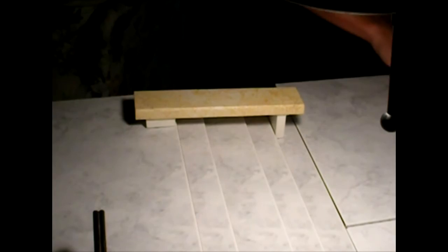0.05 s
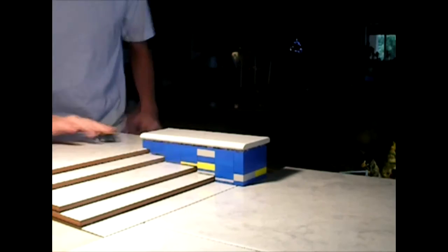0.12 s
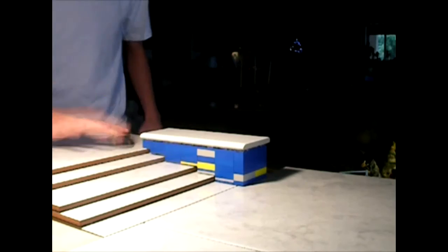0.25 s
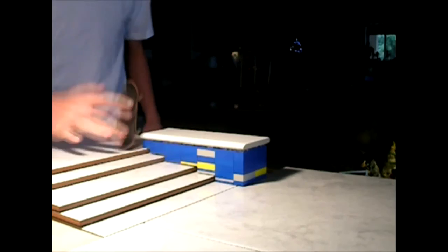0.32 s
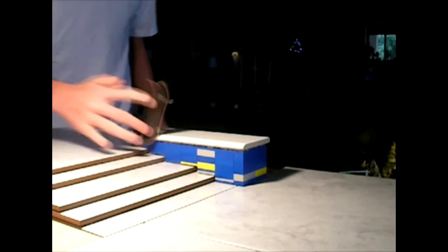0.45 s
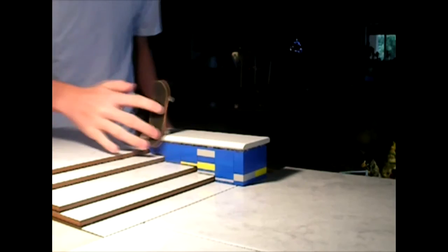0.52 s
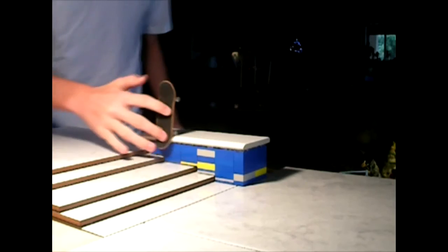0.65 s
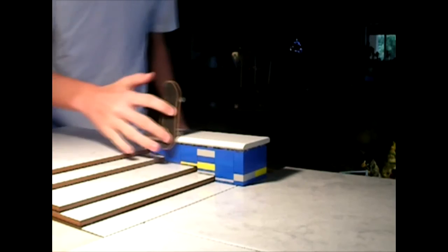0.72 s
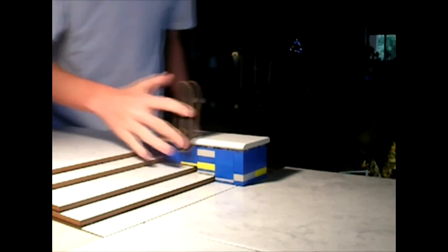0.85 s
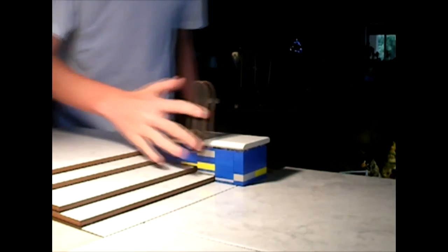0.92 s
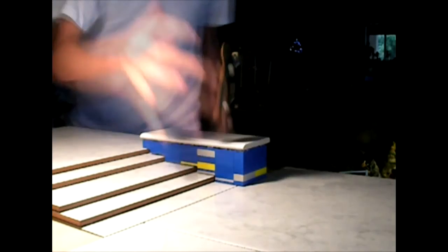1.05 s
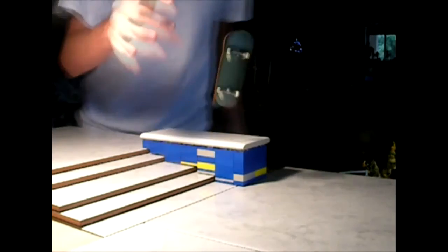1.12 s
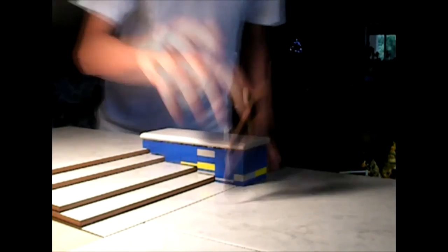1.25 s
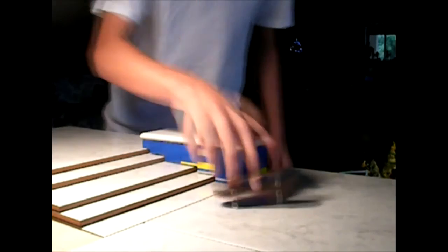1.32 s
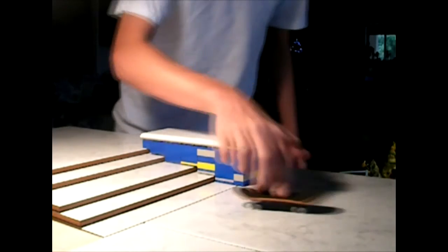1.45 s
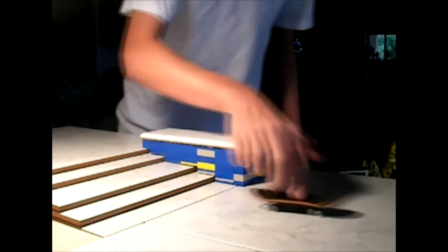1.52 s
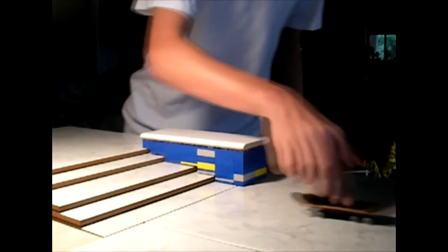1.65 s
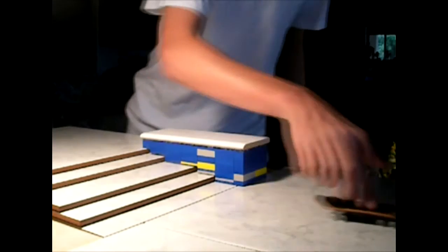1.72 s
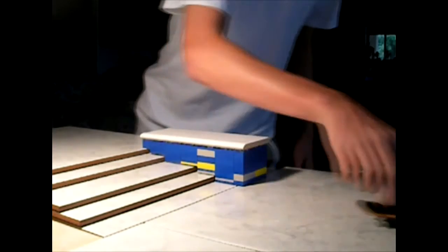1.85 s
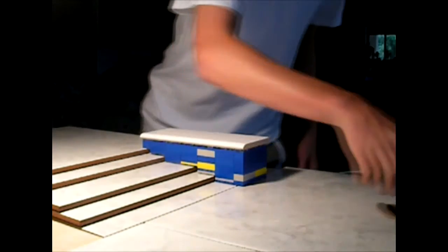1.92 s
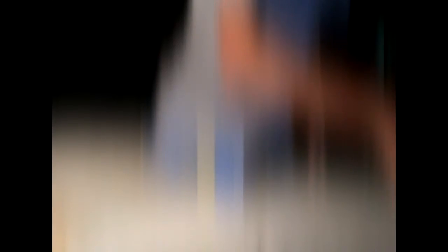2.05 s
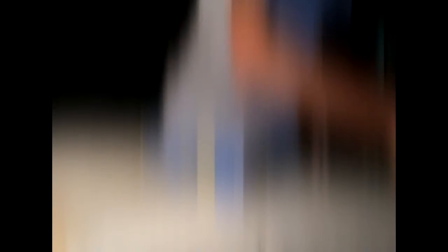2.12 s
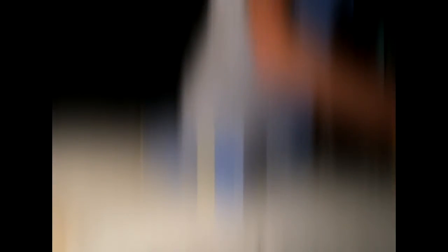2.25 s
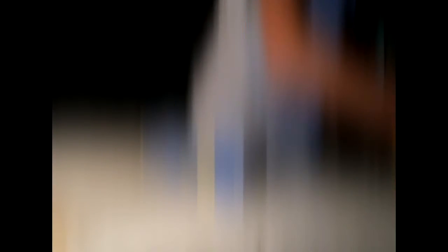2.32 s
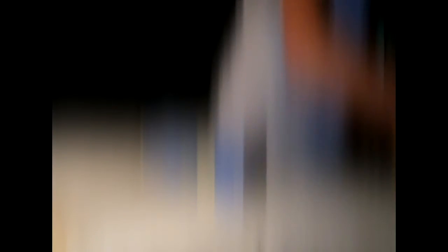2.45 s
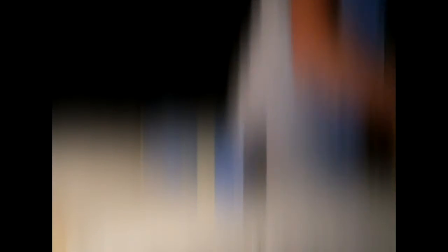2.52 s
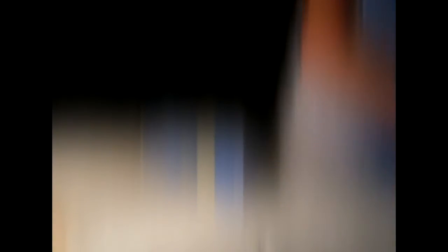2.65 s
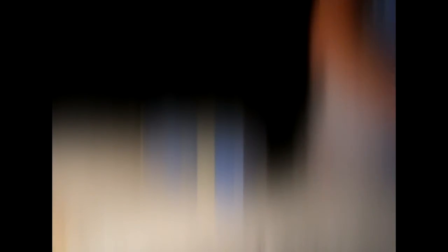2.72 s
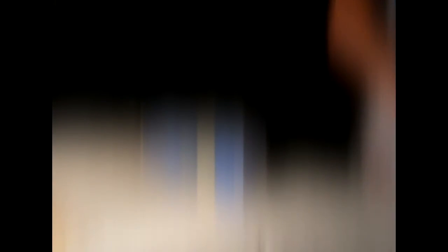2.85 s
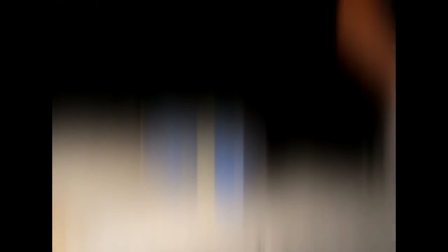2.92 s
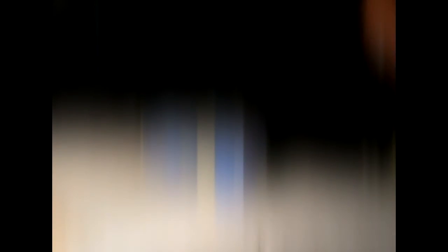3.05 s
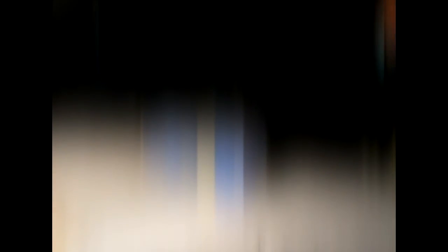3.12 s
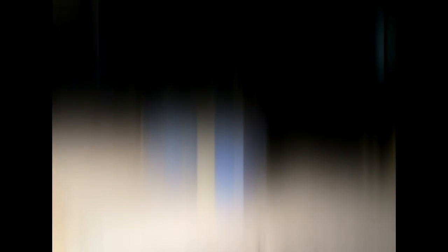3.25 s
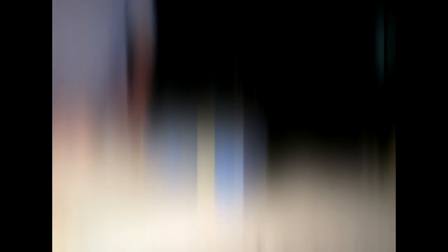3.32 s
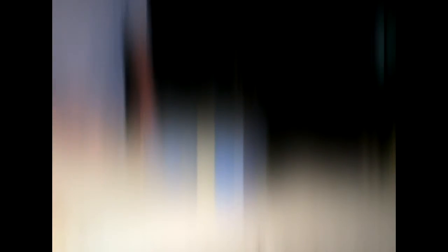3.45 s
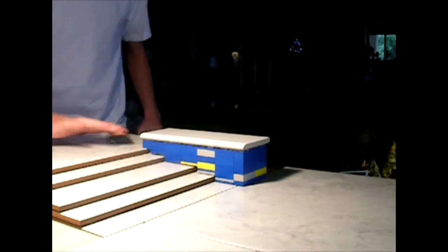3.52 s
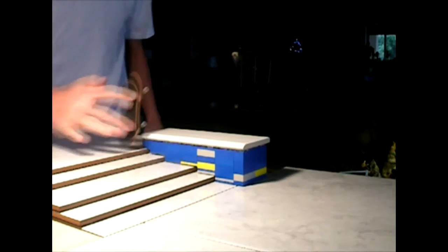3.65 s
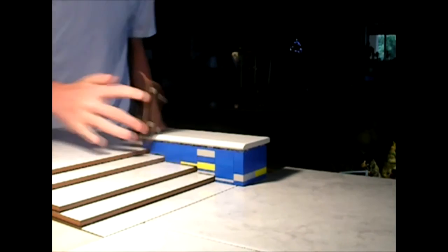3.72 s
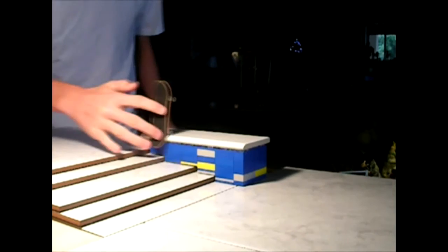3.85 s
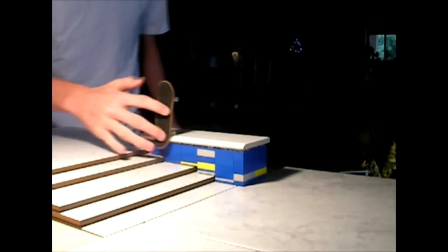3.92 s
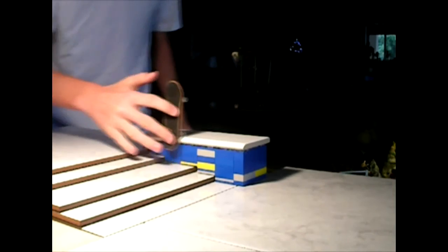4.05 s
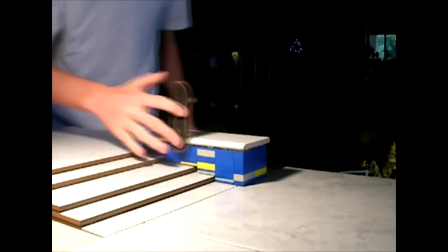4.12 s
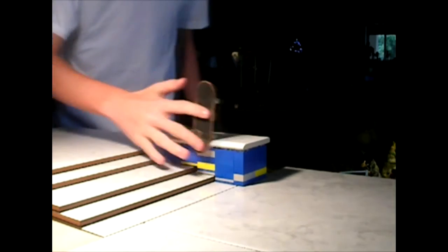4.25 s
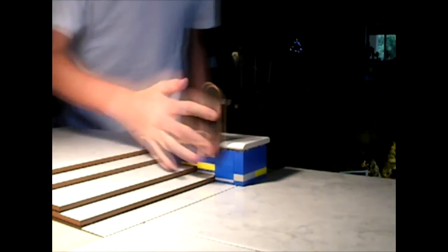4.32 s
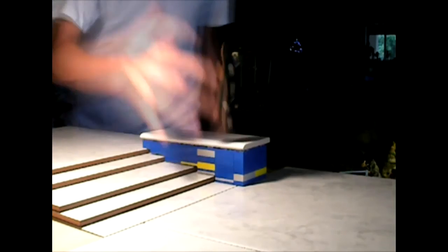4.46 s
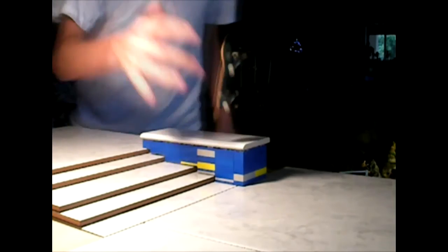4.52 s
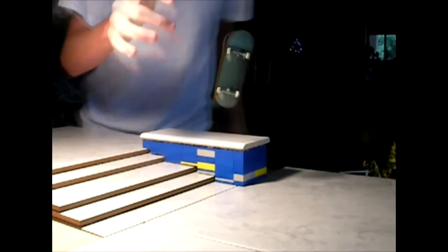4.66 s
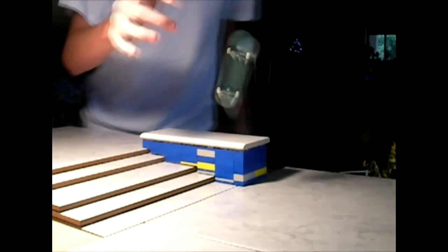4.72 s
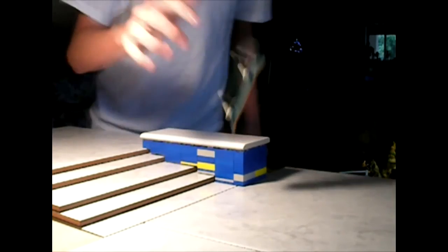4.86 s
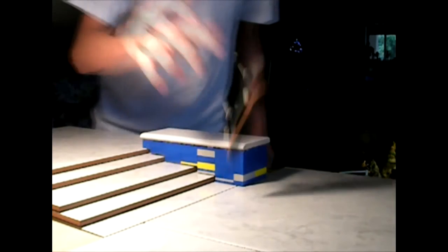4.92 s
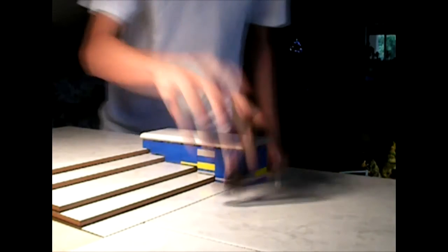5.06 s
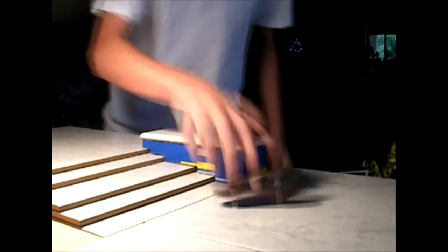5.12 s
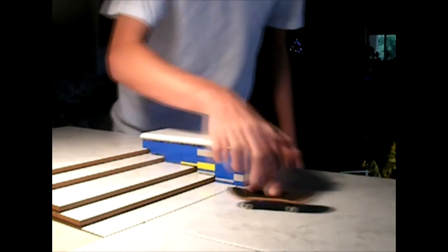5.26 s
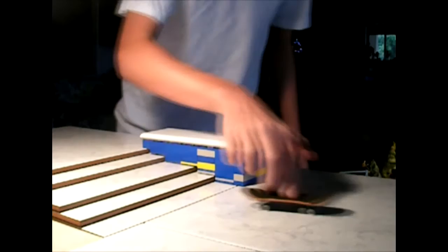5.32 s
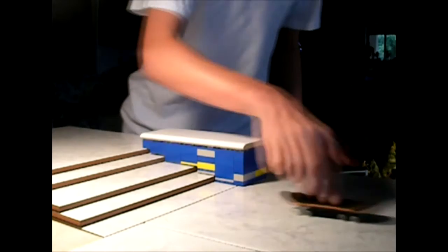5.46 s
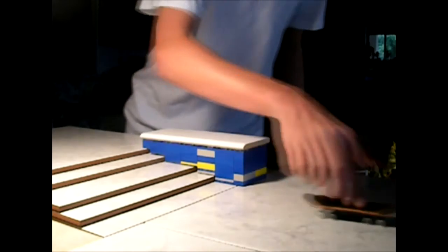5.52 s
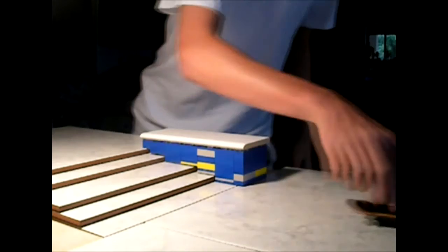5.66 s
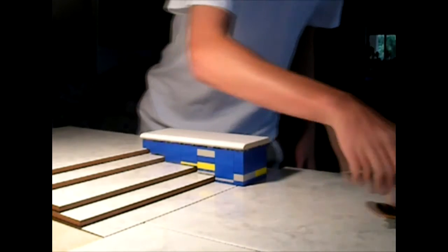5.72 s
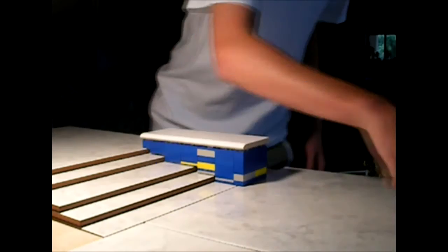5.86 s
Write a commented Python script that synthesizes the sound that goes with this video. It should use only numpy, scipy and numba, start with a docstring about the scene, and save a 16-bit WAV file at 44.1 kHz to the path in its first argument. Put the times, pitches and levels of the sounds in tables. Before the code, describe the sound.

A toy fingerboard rolls softly on a tabletop, heard close through a dull mono microphone with steady faint hiss. At about 0.4 seconds it pops with a sharp click, then clatters onto a small hollow ledge from 0.6 to 0.7 seconds. Faint scuffs follow near 1.2. Around 1.5 seconds it lands on the table in a quick burst of clacks and rolls on, its little wheels whirring with a light rumble. It knocks against a wooden obstacle at 2.2 seconds and harder at 2.45, rattles briefly, and gives lighter taps near 2.9 and 3.1. The first trick then repeats: a soft run-up from 3.4 seconds, a pop at 3.75 and ledge clatter around 3.9 to 4. The hiss drops slightly, and two faint scuffs come near 4.6. Another clacking landing at 5.3 seconds leads into a roll that fades by about 5.9.

```python
"""Fingerboard tricks on a tabletop

A fingerboard rolls up, pops onto a hollow ledge, drops to a table and clatters over a wooden obstacle.
Each impact sets the surface and the little deck in free, damped vibration; between impacts, surface
roughness forces a rumble and makes the wheels sing. A few soft scuffs are heard. The run-up and the
landing sound a second time, all over the hiss of a dull mono microphone."""
import sys
import numpy as np
from scipy import signal
from scipy.fft import rfft, irfft
from scipy.io import wavfile
from scipy.ndimage import uniform_filter1d
from numba import njit

SR = 44100
rng = np.random.default_rng(int(sys.argv[2]) if len(sys.argv) > 2 else 0)


def dump_mix(stems):
    """Bounce the given channels to the path in sys.argv[1] as a 16-bit WAV at rate SR."""
    frames = np.atleast_2d(stems).T  # one column per channel
    limited = np.clip(frames, -1, 1)  # hard clip at full scale
    pcm = np.round(limited * 32767).astype(np.int16)
    wavfile.write(sys.argv[1], SR, pcm)


N = 260410
TIME = np.arange(N) / SR
AGE = TIME[:SR // 3]  # time since an impact

# normal modes: f/Hz, relative energy/dB, t60/s
PLATFORM_MODES = [(154.3, -6.5, 0.1), (197, -13, 0.1), (312, 0.5, 0.091), (362, -4, 0.037), (470, 1, 0.049),
                  (563, 4.5, 0.11), (696, 1, 0.041), (884, -8, 0.05), (1400, -11.5, 0.016),
                  (1566, -13, 0.066), (2440, -8, 0.022), (3460, -1, 0.017), (4260, -9.5, 0.013)]
LEDGE_MODES = [(152, -8, 0.096), (251, -9, 0.086), (299, 0, 0.096), (349, -4, 0.11), (393, 1, 0.043),
               (494, -11, 0.033), (558, -6, 0.042), (709, -6.5, 0.065), (790, -5, 0.018), (956, -2, 0.034),
               (1520, -2, 0.0093), (1912, -6, 0.02), (3070, -13.5, 0.077)]
TABLE_MODES = [(131, -19.5, 0.29), (158, -19, 0.15), (186, -20, 0.15), (317, -8, 0.12), (393, -9.5, 0.068),
               (452, -5.5, 0.051), (532.4, 1, 0.095), (687, -5, .04), (888, 5, 0.025), (1037, -1, 0.066),
               (1180, -5, 0.023), (1552, -7.5, 0.11), (1940, -4, .05), (2350, -8.5, .07), (2460, -9, 0.12)]
OBSTACLE_MODES = [(150, -17, 0.31), (220, -8, 0.081), (347, -0.5, 0.045), (444, -2.5, 0.084),
                  (515, -6, 0.069), (685, 0.5, 0.048), (740, -3.5, 0.031), (840, 8.5, 0.026),
                  (950, 2, 0.045), (1010, 0, 0.035), (1240, -8.5, 0.043), (1413, -6.5, .05),
                  (1460, -9, 0.096), (1844, -19, 0.13), (2080, -15.5, 0.092), (2930, -20.5, .06)]
DECK_MODES = [(1577, -2, 0.24), (1959, 5, 0.028), (2220, 3, 0.028), (2377, 1.5, 0.072), (2592, -7, .05),
              (2890, -1, 0.066), (2970, -7, 0.05), (3530, -0.5, 0.022), (3620, -9.5, .025),
              (4440, -5.5, 0.031)]
HELD_DECK_MODES = [(499, -4.5, 0.077), (974, 0, .025), (1413, -1, 0.034), (1840, -2, 0.0056),
                   (2650, -12.5, 0.012), (3240, -11, 0.016)]  # damped by fingers
TRUCK_MODES = [(735, -6.5, 0.019), (960, -1.5, 0.0084), (1107, -0.5, 0.039), (1330, -9, 0.005),
               (1630, -5, 0.025), (1690, -11.5, 0.029)]  # trucks and wheels under load
# stretches of rolling: start t/s, end t/s, wheel ring level/dB, rumble level/dB, grit level/dB,
# wheel tone f/Hz, tone-to-truck ratio/dB, run-out t60/s
ROLLS = [ (0.0, .1, -32.5, -48, -44, 898, -2, .03), (.145, .165, -35.5, -48, -40.5, 1270, -5, 0.36),
         (.215, .295, -40, -47, -46.5, 1410, -0.5, 0.18), (.4, .43, -34.5, -42.5, -37, 1070, -21, 0.093),
         (1.53, 1.7, -36, -45, -53.5, 891, -0.5, 0.25), (1.725, 1.915, -32.5, -42, -45, 885, 5, 0.62),
         (2.04, 2.2, -35, -38, -51.5, 855, 6.5, 0.14), (2.25, 2.315, -31.5, -35, -29.5, 890, 5, 0.13),
         (2.35, 2.59, -32, -36.5, -41.5, 870, 1, 0.61), (2.88, 3.03, -49, -47.5, -63, 870, 6.5, 0.23),
         (3.047, 3.055, -34.5, -44, -63, 853, 13, 0.088)]
# impacts, with relative levels: t/s, thud level/dB, knock level/dB, crack level/dB, contact f/Hz
POP_HITS = [(.4418, -23.5, -25, -15.5, 2605), (.4522, -23, -25, -29, 2690)]
LEDGE_HITS = [(.5905, -24, -16.5, -25, 1600), (.6066, -13.5, -18, -23, 1890), (.618, -21, -32, -25.5, 2350),
              (.6305, -25.5, -18.5, -23, 2110), (.6425, -28, -27.5, -27.5, 3270),
              (.6795, -21.5, -21.5, -28, 2150), (.7105, -30, -35.5, -39.5, 1950)]
TABLE_HITS = [(1.4391, -23, -15, -12, 3710), (1.4403, -21.5, -21, -15, 1915),
              (1.4528, -30, -29, -25.5, 2680), (1.4795, -10, -21.5, -20, 3680),
              (1.4865, -23.5, -23, -21.5, 2430), (1.496, -20, -23, -18, 2300),
              (1.508, -15, -23.5, -18, 2400), (1.5215, -25.5, -29, -25.5, 2490)]
OBSTACLE_HITS = [(2.2166, -14, -17, -12, 1620), (2.2257, -24, -20, -17, 1600),
                 (2.239, -23, -24, -25.5, 2900), (2.4392, -29, -15, -16, 1400), (2.451, -5, -8, -14, 2760),
                 (2.4628, -27.5, -33, -27.5, 2200), (2.8535, -19.5, -21.5, -34, 3570),
                 (3.0605, -27, -37, -53, 1410), (3.0955, -24, -34, -30, 2720)]
# wheels and board running down after an impact: t/s, whirr level/dB, shake level/dB, t60/s
SPINS = [(0.457, -36, -38, 0.41), (0.647, -44, -36, 0.44), (1.445, -43.5, -45.5, 0.38),
         (1.526, -30, -34, 0.86), (2.53, -31.5, -27, 0.37)]
# soft scuffs, and the faint lead-in as the run-up sounds again: t/s, level/dB, Gaussian half-width/s
SOFT_SWELLS = [(1.112, -49, 0.009), (1.17, -37.5, 0.0083), (3.398, -43, 0.033), (4.617, -41, 0.0078),
               (4.675, -40.5, 0.0075)]
# noise spectra and frequency responses: f/Hz, relative level/dB
RUMBLE_SPECTRUM = [(60, -26), (110, -14), (155, -5), (240, -10.5), (320, 2.5), (390, 5), (455, 0),
                   (530, 1.5), (640, -6), (900, -11), (1600, -31)]
GRIT_SPECTRUM = [(900, -23), (1600, -3), (2100, 5.5), (2800, 2), (3600, -1), (4400, -5), (5400, -5.5),
                 (9000, -5)]
CRACK_SPECTRUM = [(400, -20.5), (1000, -5), (2000, 4.5), (3400, -0.5), (4400, -2), (5500, -4), (9000, -7.5)]
HISS_SPECTRUM = [(20, 9.5), (60, -8), (110, -12), (190, 3.5), (245, -1), (320, 5), (450, 1.5), (900, -1.5),
                 (1900, -7.5), (3000, -12), (4200, -20), (9000, -17.5)]
IMPACT_LOW_CUT = [(30, -24.5), (80, -12), (135, -5), (300, 0)]  # low cut applied to the impacts
MICROPHONE_RESPONSE = [(20, -3.5), (70, -3), (140, -0.5), (3900, -0.5), (4500, -5.5), (5100, -13.5),
                       (6200, -27.5), (7000, -35.5), (8000, -35.5), (9500, -49), (12500, -45)]
# brief dips in the hiss: t/s
HISS_DIPS = [4.248, 4.348, 4.647, 4.846, 5.012, 5.147, 5.246]
# passages that sound again: start t/s, end t/s, delay/s, gain/dB
REPEATS = [(.11, 1.0, 3.3034, 0), (1.42, 2.1, 3.8372, -3.2)]

PUSH_RISE_S = 0.019  # time constant of the swell as the fingers push
COAST_DB_PER_S, COAST_OCTAVES_PER_S = 4.5, 0.37  # level and pitch sag as the board slows


def undb(db):
    """Amplitude ratio of a level in decibels."""
    return 10 ** (np.asarray(db) / 20)


def unit(x):
    """Normalisation to rms 1."""
    return x / np.sqrt(np.mean(x ** 2))


def unit_pulse(x):
    """Normalisation to the energy of 5 ms at rms 1."""
    return x / np.sqrt(np.sum(x ** 2) / (SR / 200))


def decay(t, t60):
    """Exponential damping, 60 dB in t60."""
    return np.exp(-np.log(1000) * t / max(t60, 1e-3))


def add(track, start_s, sound):
    """Superposition of a sound on the track."""
    i = max(int(start_s * SR), 0)
    track[i:i + len(sound)] += sound[:max(N - i, 0)]


def colour(x, points, size=4096):
    """Minimum-phase filtering along (f/Hz, level/dB) points."""
    hz, db = np.transpose(points)
    f = np.maximum(np.fft.rfftfreq(size, 1 / SR), 1)
    gain = undb(np.interp(np.log(f), np.log(hz), db))
    cepstrum = irfft(np.log(gain))
    cepstrum[1:size // 2] *= 2
    cepstrum[size // 2 + 1:] = 0
    return signal.fftconvolve(x, irfft(np.exp(rfft(cepstrum))))[:len(x)]


@njit
def resonate(x, hz, width_hz):
    """Second-order resonance with a moving centre frequency."""
    y, band_state, low_state = np.empty(len(x)), 0., 0.
    for i in range(len(x)):
        g, damping = np.tan(np.pi * hz[i] / SR), width_hz / hz[i]
        band = (band_state + g * (x[i] - low_state)) / (1 + g * (g + damping))
        band_state = 2 * band - band_state
        low_state += 2 * g * band
        y[i] = damping * band
    return y


def wander(per_s):
    """Smooth random modulation, rms 1."""
    hold = int(SR / per_s)
    steps = np.repeat(rng.standard_normal(N // hold + 1), hold)
    return unit(uniform_filter1d(steps, hold)[:N])


def roughness(spread_db=0.5, per_s=12000):
    """Shot noise: dense, tiny impacts on a rough surface."""
    impulses = (rng.random(N) < per_s / SR) * rng.standard_normal(N)
    return impulses * undb(spread_db * np.minimum(rng.exponential(size=N), 4))


def free_modes(modes, scatter_db, detune=0.0052):
    """Free vibration: one damped sine per mode; the point struck sets their shares and phases."""
    hz, db, t60 = np.transpose(modes)
    tuning, strength, phase = rng.standard_normal((len(hz), 3)).T
    hz = hz * (1 + detune * tuning)
    waves = [unit_pulse(np.sin(2 * np.pi * f * AGE + p) * decay(AGE, d))
             for f, p, d in zip(hz, np.pi * phase, t60)]
    share = undb(db + scatter_db * strength)
    return np.array(waves) * (share / np.linalg.norm(share))[:, None]


def forced_modes(modes):
    """Forced vibration: roughness convolved with a body's impulse response, rms 1."""
    force = roughness()
    response = free_modes(modes, scatter_db=-1, detune=0).sum(axis=0)
    return unit(signal.fftconvolve(force, response)[:N])


def rumble(table_db=-4):
    """Roughness excitation shakes the board and the table under it, rms 1."""
    board = unit(colour(roughness(), RUMBLE_SPECTRUM))
    table = unit(colour(forced_modes(TABLE_MODES), RUMBLE_SPECTRUM))
    return unit(board + undb(table_db) * table)


def wheel_tone(pitch_hz, width_hz=95.):
    """Contact resonance of the wheels; finger pressure keeps its strength fairly even."""
    centre_hz = pitch_hz * (1 + 0.0097 * wander(25))
    tone = unit(resonate(resonate(roughness(), centre_hz, width_hz), centre_hz, width_hz))
    power = uniform_filter1d(tone ** 2, SR // 60)
    return unit(tone / np.sqrt(power + 0.62))


def rattle(deck_db):
    """Broadband wheel and axle noise with forced vibration of the deck, rms 1."""
    grit = unit(colour(roughness(), GRIT_SPECTRUM))
    return unit(grit + undb(deck_db) * forced_modes(DECK_MODES))


def push(start, end, run_out_t60):
    """Exponential envelope of one roll: a quick swell, a slow sag while coasting, then the run-out."""
    swell = np.exp(np.minimum(TIME - start, 0) / PUSH_RISE_S)
    coast = undb(-COAST_DB_PER_S * np.maximum(TIME - start, 0))
    return swell * coast * decay(np.maximum(TIME - end, 0), run_out_t60)


def rolling(flutter_db=1.5):
    """Rolling noise: rumble, wheel ring and grit, amplitude-modulated by the uneven wheels."""
    pitch_hz = np.full(N, float(ROLLS[0][5]))
    for start, _, _, _, _, hz, _, _ in ROLLS:
        sagging_hz = hz * 2 ** (-COAST_OCTAVES_PER_S * (TIME - start))
        pitch_hz = np.where(TIME > start - 2 * PUSH_RISE_S, sagging_hz, pitch_hz)
    low, tone = rumble(), wheel_tone(pitch_hz)
    trucks, grit = forced_modes(TRUCK_MODES), rattle(deck_db=-6.5)
    out = np.zeros(N)
    for start, end, ring_db, rumble_db, grit_db, _, tone_db, run_out_t60 in ROLLS:
        wheels = (undb(tone_db) * tone + trucks) / np.hypot(undb(tone_db), 1)
        roll = undb(ring_db) * wheels + undb(rumble_db) * low + undb(grit_db) * grit
        out += push(start, end, run_out_t60) * roll
    return out * undb(flutter_db * wander(90))


def hiss(level_db=-45.5, waver_db=1.15, drop_db=4, dip_db=14, dip_s=0.006):
    """Filtered Gaussian noise whose level wavers, settles lower and then dips now and again."""
    settled = np.clip((TIME - 4.2) / 0.15, 0, 1)
    dips = sum(np.exp(-.5 * ((TIME - t) / dip_s) ** 2) for t in HISS_DIPS)
    db = level_db - drop_db * settled + waver_db * wander(11) - dip_db * dips
    return undb(db) * unit(colour(rng.standard_normal(N), HISS_SPECTRUM))


def impacts(hits, modes, body_db, deck_db, burst_t60, contact_width_hz, contact_db, lag_s, second_db):
    """Impulse excitation: the surface rings and the deck cracks; a second wheel lands lag_s later."""
    out = np.zeros(N)
    mode_hz = np.transpose(modes)[0]
    onset = 1 - np.exp(-AGE / 0.0006)  # the force takes a moment to build
    for t, thud_db, knock_db, crack_db, contact_hz in hits:
        weight = undb(body_db + np.interp(mode_hz, [450, 800], [thud_db, knock_db]))
        contact = np.sin(2 * np.pi * contact_hz * AGE) * np.exp(-np.pi * contact_width_hz * AGE)
        for delay, gain in ((0, 1), (lag_s, undb(second_db))):
            surface = weight @ free_modes(modes, scatter_db=0.5) * onset
            burst = colour(rng.standard_normal(len(AGE)) * decay(AGE, burst_t60), CRACK_SPECTRUM)
            deck = free_modes(DECK_MODES, scatter_db=1.5).sum(axis=0)
            click = undb(-5.5) * unit_pulse(burst) + undb(contact_db) * unit_pulse(contact)
            crack = click + undb(deck_db) * deck
            add(out, t + delay, gain * (surface + undb(crack_db) * crack))
    return out


def reverberate(x, wet_db, t60, delay_s=0.005):
    """Scattering from nearby objects adds a short, coloured tail."""
    tail = rng.standard_normal(len(AGE)) * decay(AGE, t60) * (AGE > delay_s)
    tail = colour(tail, [(100, -4.5), (600, 3), (1500, -4.5), (4000, -0.5)])
    return x + undb(wet_db) * signal.fftconvolve(x, tail / np.linalg.norm(tail))[:N]


def spinning():
    """Damped motion after an impact: wheels rattle on their axles and the board shakes."""
    whirr, shake = rattle(deck_db=-10), rumble()
    out = np.zeros(N)
    for t, whirr_db, shake_db, t60 in SPINS:
        run_down = (TIME > t) * decay(np.abs(TIME - t), t60)
        out += run_down * (undb(whirr_db) * whirr + undb(shake_db) * shake)
    return out


def soft_swells():
    """Forced vibration of the damped deck: soft scuffs, and the faint lead-in to the repeated run-up."""
    swells = sum(undb(db) * np.exp(-.5 * ((TIME - t) / width) ** 2) for t, db, width in SOFT_SWELLS)
    return swells * forced_modes(HELD_DECK_MODES)


def scene():
    """Superposition of the tricks, their repeats and the hiss, alike in both channels."""
    clacks = impacts(POP_HITS, PLATFORM_MODES, body_db=0.5, deck_db=-18.5, burst_t60=0.013,
                     contact_width_hz=190, contact_db=-9.5, lag_s=0.001213, second_db=0.5)
    clacks += impacts(LEDGE_HITS, LEDGE_MODES, body_db=0, deck_db=-12.5, burst_t60=0.039,
                      contact_width_hz=370, contact_db=-9.5, lag_s=0.005, second_db=-2)
    clacks += impacts(TABLE_HITS, TABLE_MODES, body_db=2.5, deck_db=-9.5, burst_t60=0.022,
                      contact_width_hz=430, contact_db=-8.5, lag_s=0.001307, second_db=-2)
    clacks += impacts(OBSTACLE_HITS, OBSTACLE_MODES, body_db=2, deck_db=-10.5, burst_t60=0.012,
                      contact_width_hz=170, contact_db=-7.5, lag_s=0.001334, second_db=-3.5)
    radiated = colour(clacks, IMPACT_LOW_CUT)
    board = reverberate(radiated, wet_db=-13, t60=0.35) + rolling() + spinning()
    out = board + soft_swells() + hiss()
    for start, end, delay, db in REPEATS:
        add(out, start + delay, undb(db) * board[int(start * SR):int(end * SR)])
    return np.array([out, out])


def record(dry):
    """Saturation and band-limiting: the small microphone rounds the hardest peaks and loses treble."""
    rounded = dry / (1 + dry ** 4) ** .25
    dull = np.array([colour(channel, MICROPHONE_RESPONSE) for channel in rounded])
    low_pass = signal.ellip(8, .2, 70, 12700, fs=SR, output="sos")
    return signal.sosfilt(low_pass, dull)


dry = scene()
out = record(dry)
dump_mix(out)
```